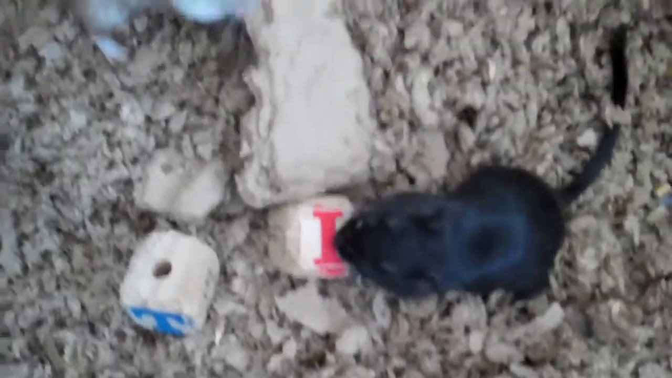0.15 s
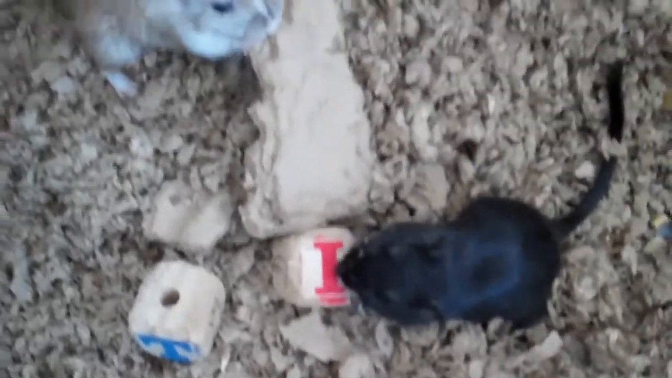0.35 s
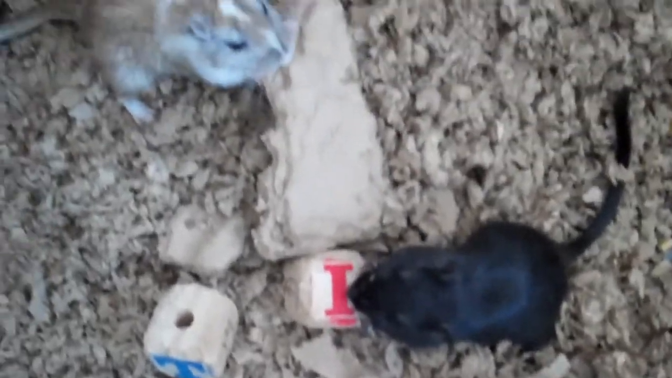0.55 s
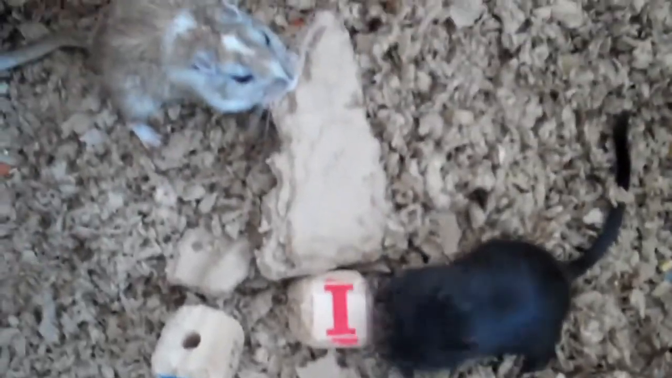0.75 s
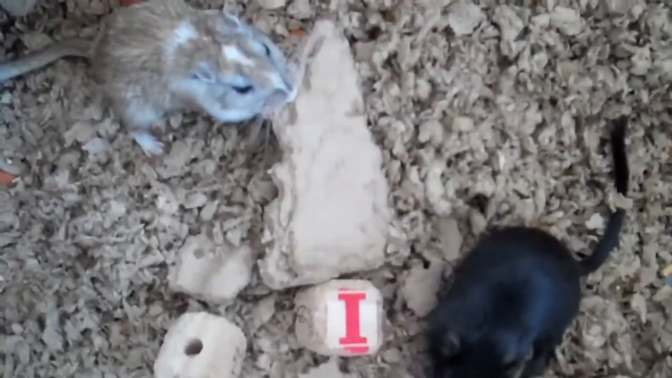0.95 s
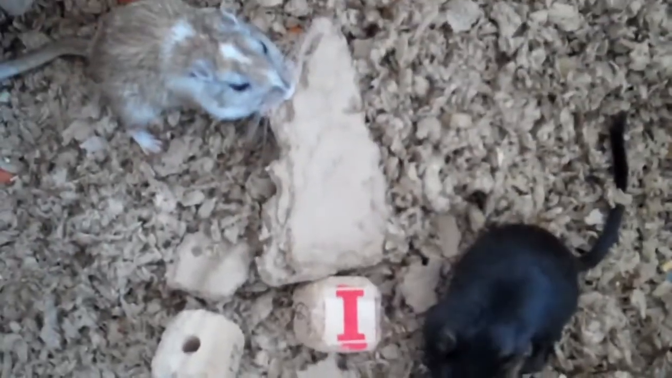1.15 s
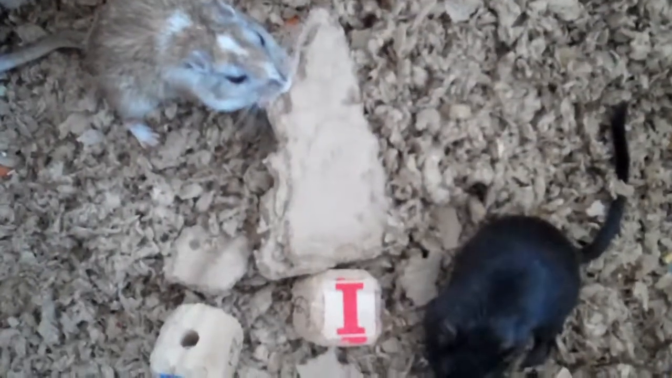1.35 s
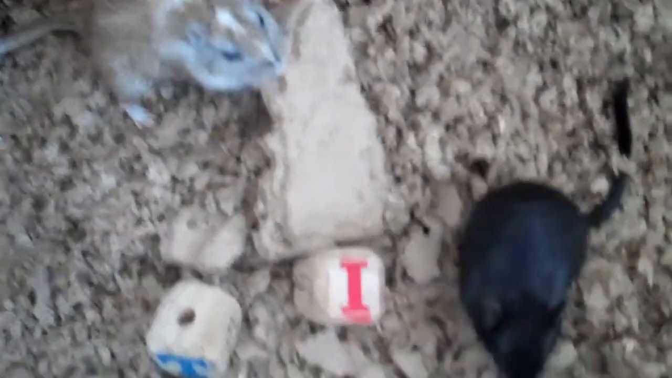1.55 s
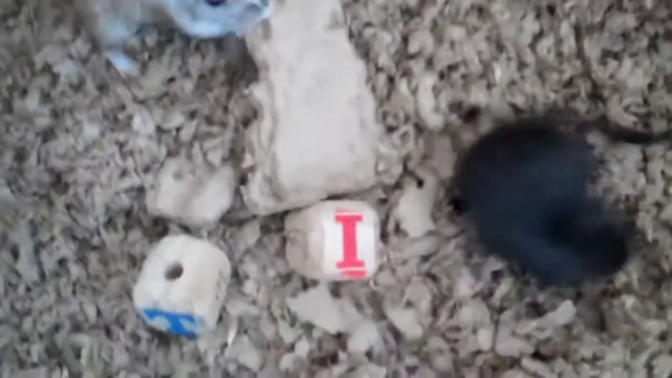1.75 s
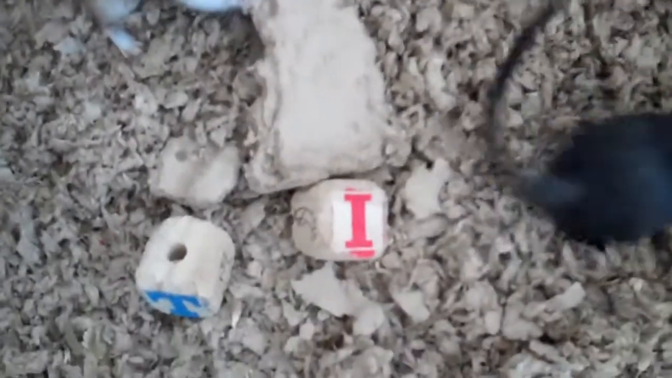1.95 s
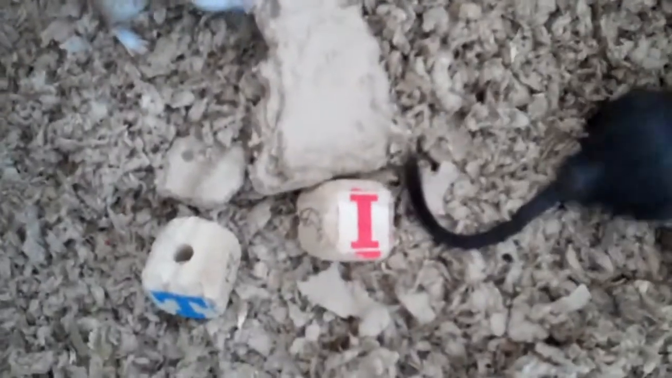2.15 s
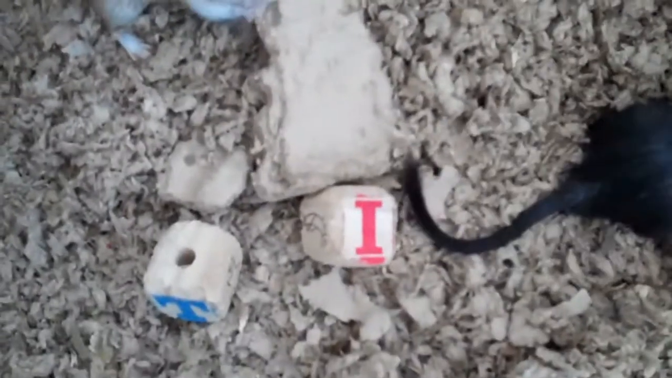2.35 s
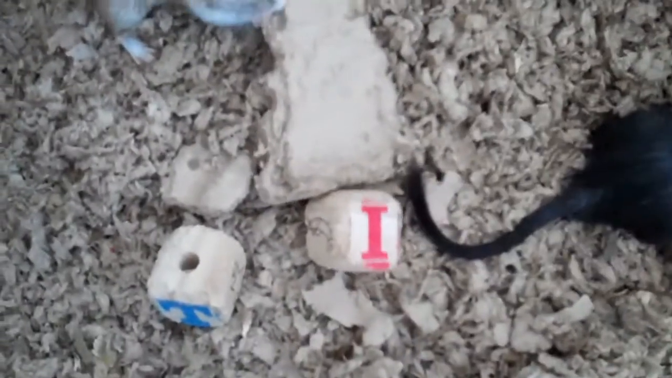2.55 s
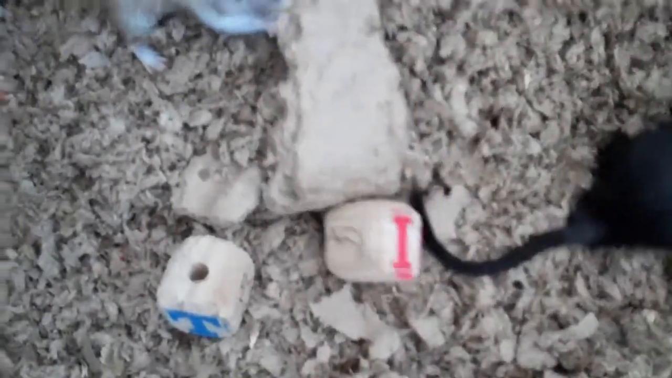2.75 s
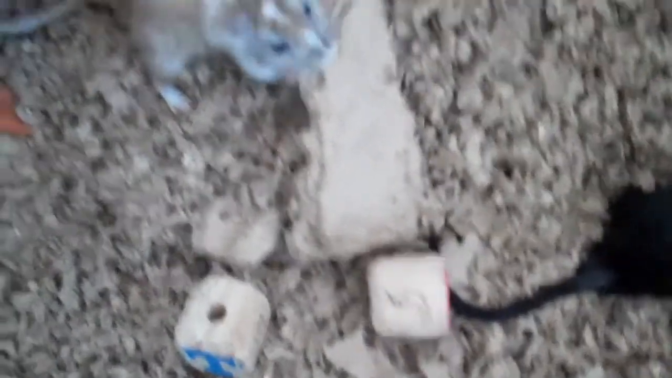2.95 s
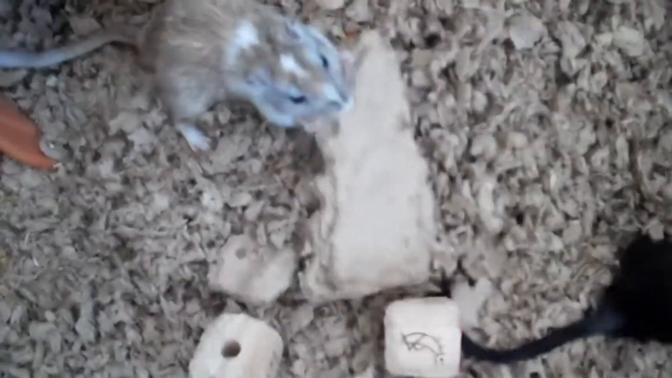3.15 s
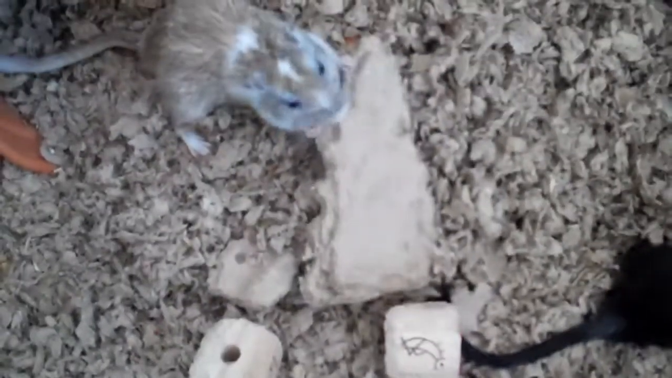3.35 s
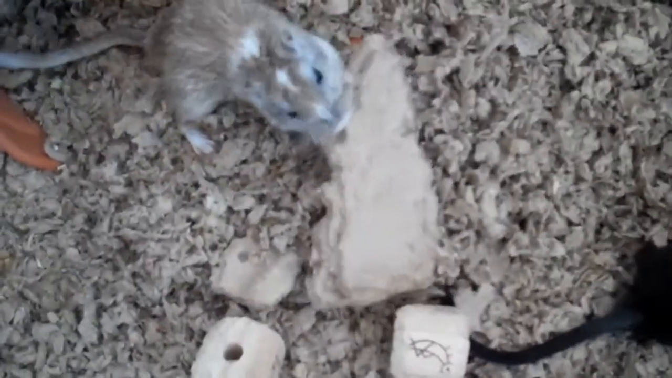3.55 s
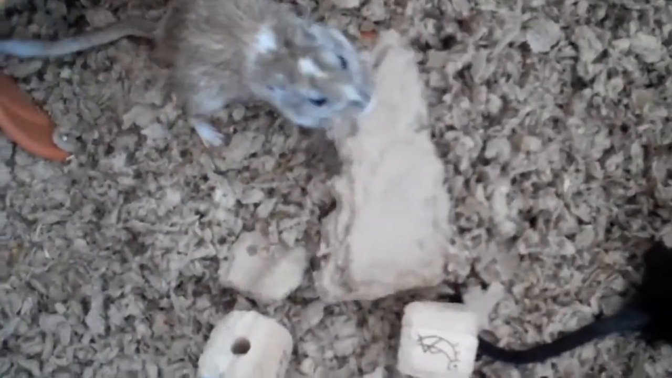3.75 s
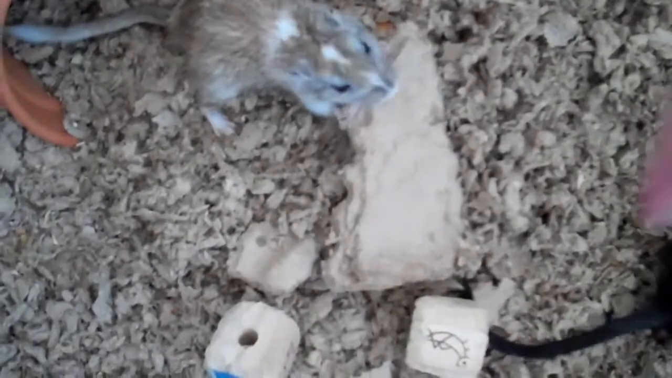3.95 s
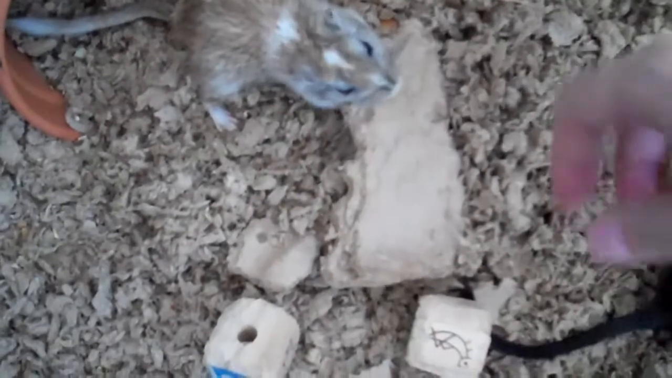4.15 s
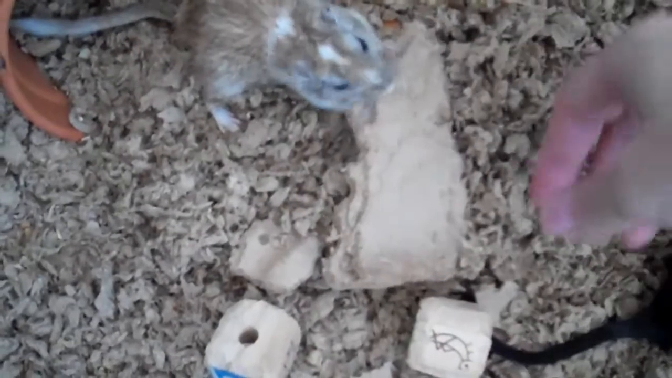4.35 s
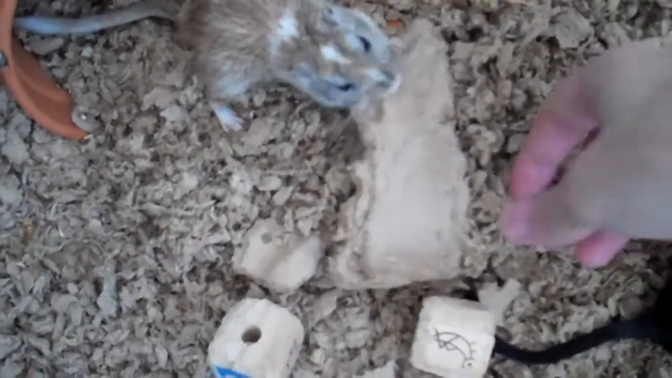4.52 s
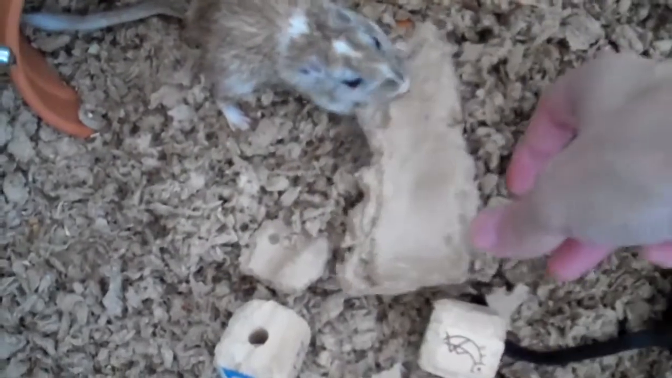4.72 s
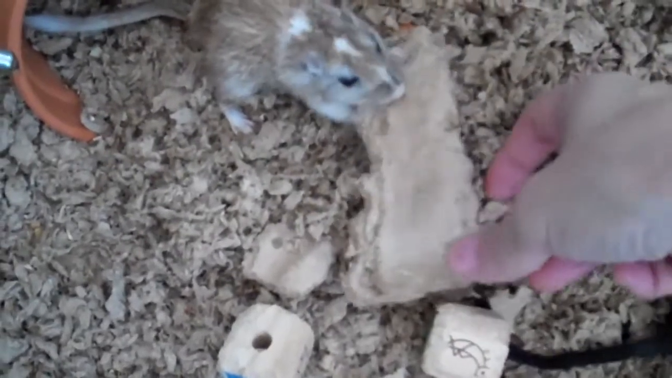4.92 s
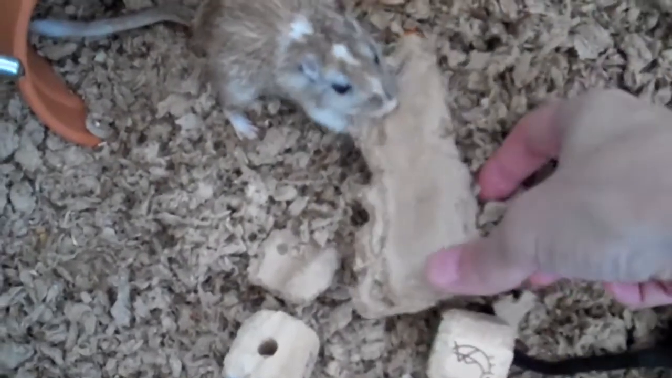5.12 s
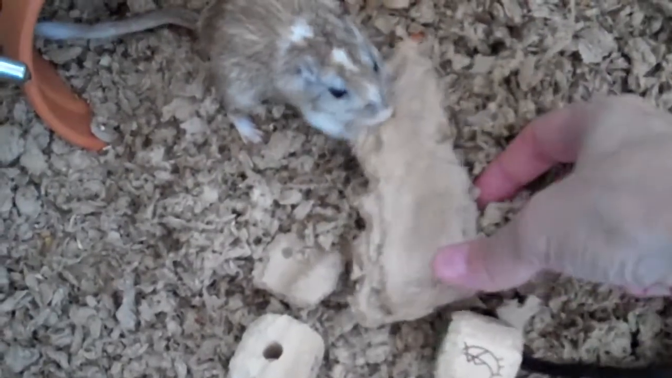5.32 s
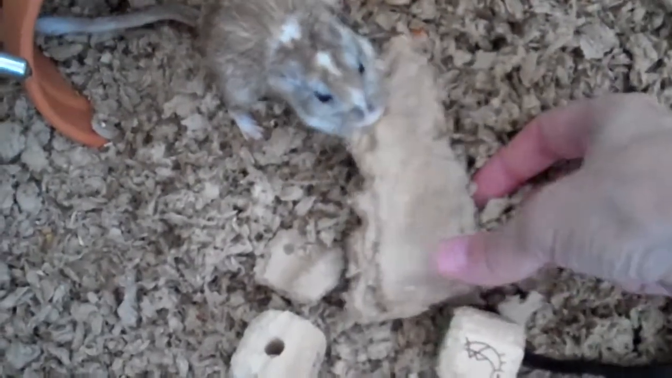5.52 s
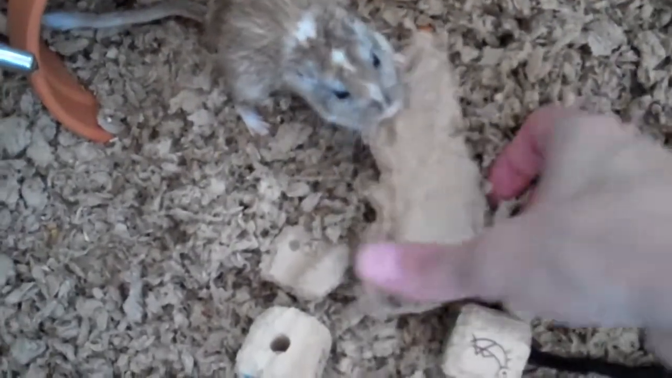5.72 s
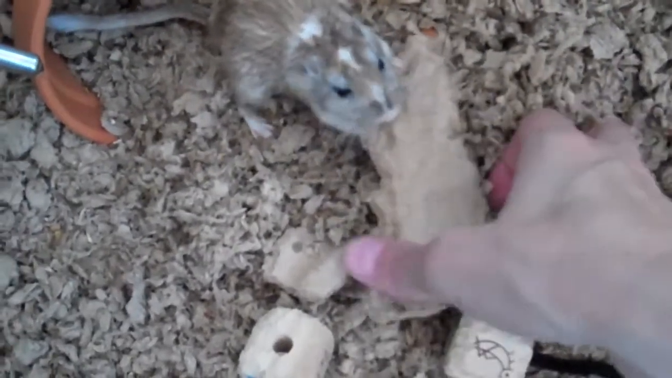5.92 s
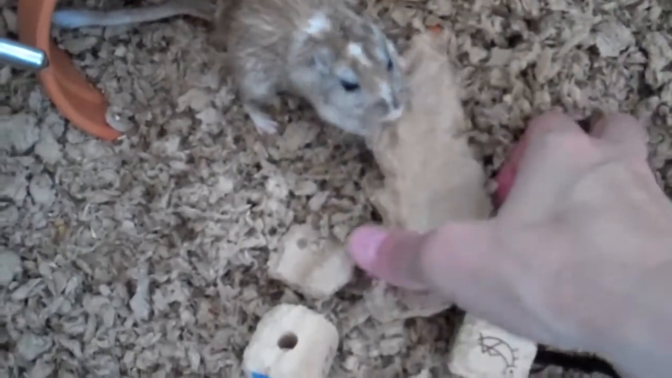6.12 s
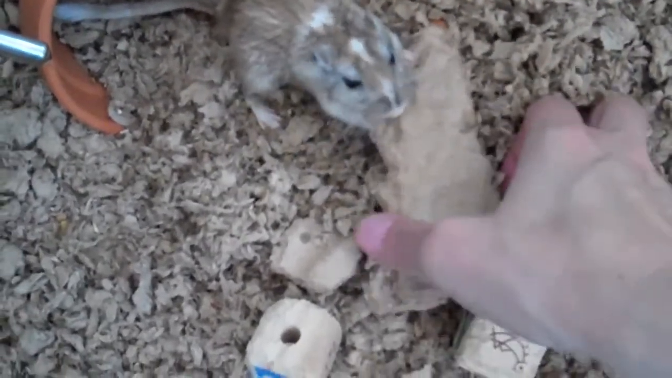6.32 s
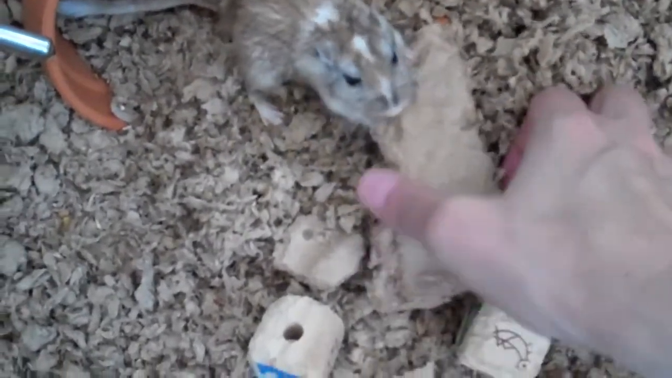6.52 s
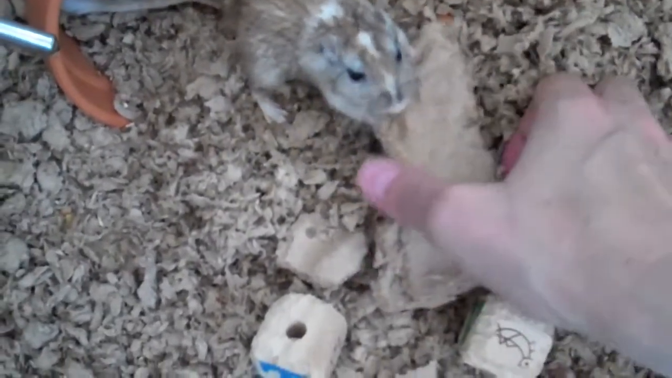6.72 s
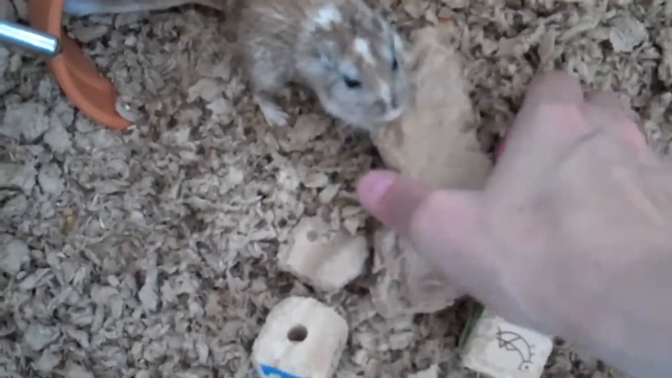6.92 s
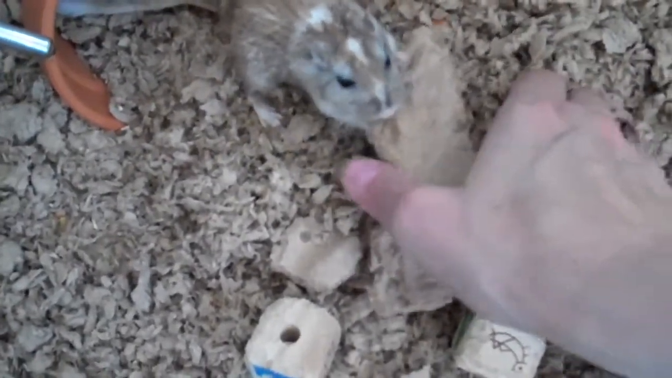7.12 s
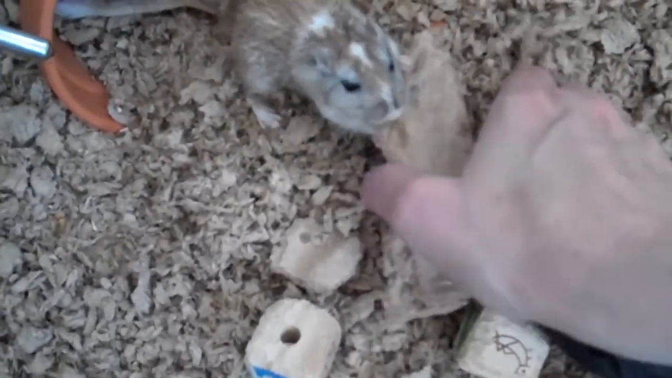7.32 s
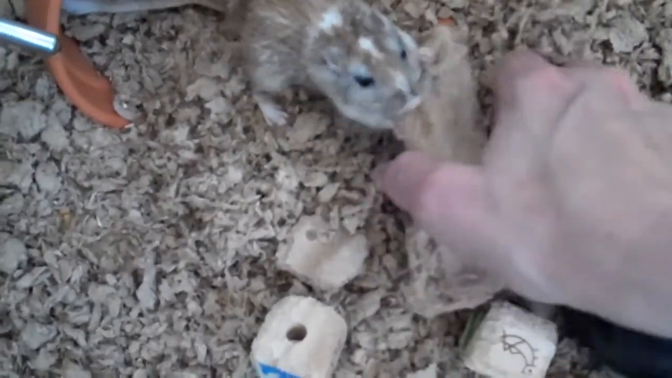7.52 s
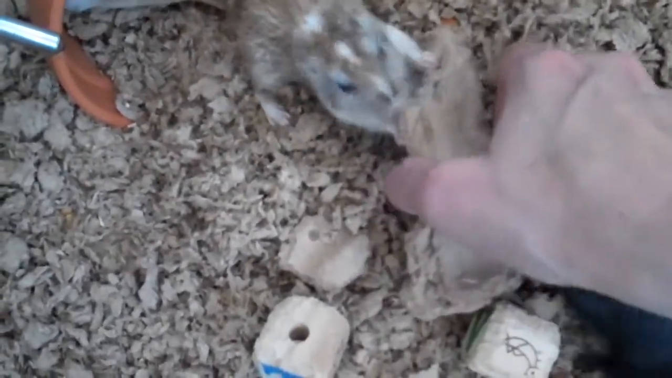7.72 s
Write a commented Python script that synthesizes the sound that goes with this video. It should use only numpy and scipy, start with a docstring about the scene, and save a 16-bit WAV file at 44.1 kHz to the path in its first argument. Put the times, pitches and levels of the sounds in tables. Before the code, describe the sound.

Close above a small rodent cage, teeth snap cardboard fibres in a few quick bites, then mostly stop. Isolated hard clicks follow amid papery scuffs as another gerbil moves off through the bedding. After a quiet gap, gnawing returns as steady bursts, about five a second, while a hand takes the strip and its tone becomes tighter. Torn edges crackle faintly over soft hiss and low rumble.

```python
"""Inside a cage, a gerbil gnaws a strip of cardboard in spells of about five bites a second.
Each bite is a run of fibre snaps; every snap travels along the strip as a bending wave, treble first.
A hand comes to hold the strip and changes its colour, and the torn edge crackles after each snap.
A second gerbil rustles through the paper bedding as crackling noise grains, the cage floor bumps softly
on a few low modes, and the room adds a faint filtered hiss and rumble."""
import sys
import numpy as np
from scipy import signal
from scipy.fft import rfft, irfft, next_fast_len
from scipy.io import wavfile
from scipy.ndimage import uniform_filter1d

SR = 44100
rng = np.random.default_rng(int(sys.argv[2]) if len(sys.argv) > 2 else 0)


def master_out(mix):
    """Clip the mix to full scale and print it as 16-bit PCM to the path in sys.argv[1]."""
    frames = np.transpose(np.atleast_2d(mix))
    ceiling = np.clip(frames, -1, 1)
    pcm = np.round(ceiling * 32767).astype(np.int16)
    wavfile.write(sys.argv[1], SR, pcm)


N = 347067
SNAP_SIZE = 4096  # samples in one snap
TOP_HZ = 15800  # upper edge of the sound


def undb(db):
    """Decibels to gain."""
    return 10 ** (np.asarray(db) / 20)


def curve(table, column=1):
    """One column of a time table, sample by sample."""
    rows = np.array(table)
    return np.interp(np.arange(N) / SR, rows[:, 0], rows[:, column])


def colour(points, hz):
    """A spectrum in dB at the given frequencies, interpolated over log frequency."""
    point_hz, db = np.transpose(points)
    return np.interp(np.log(hz + 1), np.log(point_hz), db)


def tint(x, points):
    """Filter a long sound by a spectrum and bring it to rms 1."""
    size = next_fast_len(N)
    gain = undb(colour(points, np.fft.rfftfreq(size, 1 / SR)))
    y = irfft(rfft(x, size) * gain, size)[..., :N]
    return y / y.std()


def unit(x):
    """Scale to a mean energy of 1 per channel."""
    return x / np.sqrt(np.mean(np.sum(x ** 2, axis=-1)))


def pan(left_db):
    """Channel gains for a left-minus-right level."""
    return undb(np.array([[left_db], [-left_db]]) / 2)


def walk(rate):
    """Slow random drift of spread 1, heading for a new value rate times a second."""
    y = np.interp(np.arange(N) / SR * rate, np.arange(1024), rng.standard_normal(1024))
    return y / y.std()


def swell(s, half_s):
    """A smooth rise and fall of power around time s."""
    return np.exp(-np.minimum(((np.arange(N) / SR - s) / half_s) ** 2, 40))


def treble(hz, corner_hz=5400):
    """A shelf from 0 in the body of the sound to 1 in the treble."""
    return 1 / (1 + (corner_hz / (hz + 1)) ** 6)


def add(out, s, sound):
    """Mix a sound in at time s."""
    i = max(int(s * SR), 0)
    out[:, i:i + sound.shape[-1]] += sound[..., :max(N - i, 0)]


def crackle(rate, spread_db, ring_s, shared=0.44):
    """Tiny noise grains at random times, rate a second, a few much larger than the rest."""
    sizes = undb(spread_db * np.minimum(rng.exponential(size=N), 4))
    hits = (rng.random(N) < rate / SR) * sizes
    # grains add as power, and each amplitude dies away over ring_s
    power = signal.lfilter([1], [1, -np.exp(-2 / (ring_s * SR))], hits ** 2 + 1e-12)
    noise = shared * rng.standard_normal(N) + (1 - shared) * rng.standard_normal((2, N))
    return np.sqrt(power) * noise


# Room background. Each row: time in seconds, hiss in dB, rumble in dB
ROOM_LEVELS = [(0.0, -56.5, -68), (1.6, -55, -66.5), (3.2, -58, -73), (7.87, -56.5, -71)]
# Colour of the room hiss. Each row: frequency in Hz, level in dB
HISS_COLOUR = [(90, 2.5), (170, 1.5), (260, 0.5), (500, -0.5), (1000, -1.5), (2200, -2), (4300, -2),
               (7000, -7), (10000, -13), (13000, -20.5), (15000, -37)]
# Colour of the room rumble. Each row: frequency in Hz, level in dB
RUMBLE_COLOUR = [(15, -17), (26, -8), (37, -0.5), (50, -13), (70, -4.5), (110, -11.5), (220, -33),
                 (600, -64)]


def room_tone(waver_db=0.56, waver_rate=7.9):
    """Diffuse, gently wavering hiss over a low rumble that both ears mostly share."""
    hiss = tint(rng.standard_normal((2, N)) + 0.45 * rng.standard_normal(N), HISS_COLOUR)
    rumble = tint(0.41 * rng.standard_normal((2, N)) + rng.standard_normal(N), RUMBLE_COLOUR)
    hiss = hiss * undb(curve(ROOM_LEVELS, column=1) + waver_db * walk(waver_rate))
    rumble = rumble * undb(curve(ROOM_LEVELS, column=2))
    return (hiss + rumble) * pan(1.7)


# Modes of the cage floor. Each row: frequency in Hz, level in dB, 60 dB decay time in seconds
FLOOR_RINGS = [(138, -24, 0.1), (169.7, 0.5, 0.21), (199, 2, 0.11), (261, -7, 0.11), (327, -5.5, 0.087)]
# Colour of dull rubbing. Each row: frequency in Hz, level in dB
RUBBING_COLOUR = [(60, -25), (125, -16), (230, -19), (350, 7), (600, -19), (1500, -30)]
# Paws and hand pressing on the bedding. Each row: middle in seconds, half length in seconds, level in dB
BEDDING_PRESSES = [(2.05, 0.13, -66), (3.067, 0.022, -63.5), (5.2, 0.31, -67), (5.883, 0.053, -56.5),
                   (6.256, 0.044, -57), (6.47, 0.11, -65)]
# Soft bumps on the floor. Each row: time in seconds, peak in dB before the common trim
FLOOR_BUMPS = [(2.012, -45), (2.089, -47), (6.218, -49), (6.399, -46.5), (6.57, -52)]


def cage_floor(push_s=0.024, bump_trim_db=-1.5, resting_db=-74, rub_db=-8):
    """Soft pushes ring the floor modes: bumps and slow presses over constant small movement."""
    t = np.arange(SR // 3) / SR
    ring = np.zeros(len(t))
    for hz, db, t60 in FLOOR_RINGS:
        ring += undb(db) * np.sin(2 * np.pi * hz * t) * np.exp(-np.log(1000) * t / t60)
    drone = signal.fftconvolve(rng.standard_normal(N), ring)[:N]
    rubbing = undb(rub_db) * tint(rng.standard_normal((2, N)), RUBBING_COLOUR)
    power = np.full(N, undb(resting_db) ** 2)
    for s, half_s, db in BEDDING_PRESSES:
        power += undb(db) ** 2 * swell(s, half_s)
    out = (drone / drone.std() + rubbing) * np.sqrt(power)
    for s, db in FLOOR_BUMPS:
        # the noisy push swells for half of push_s, then dies away
        push = rng.standard_normal(len(t)) * t * np.exp(-2 * t / push_s)
        bump = signal.fftconvolve(push, ring)
        add(out, s - .005, bump / np.abs(bump).max() * undb(db + bump_trim_db))
    return out


# Loud or lone fibre snaps. Each row: time in seconds, level in dB, brightness in dB,
# resonance that the place of biting favours in Hz
LOUD_SNAPS = [(0.0678, -40.5, 5, 2400), (0.1088, -46, -11, 1600), (0.1388, -24, 8, 3130),
              (0.1711, -26, 3, 2300), (0.1803, -24, -3, 2430), (0.271, -28, -2, 3120),
              (0.3103, -34.5, 1, 3200), (1.6047, -21, -10, 2700), (1.607, -19.5, 2, 1790),
              (1.7385, -28.5, -11, 2690), (2.5061, -25.5, 0, 3100), (2.555, -18.5, 8, 4000),
              (2.7505, -33, 4, 4500), (4.6346, -30.5, -9, 2500), (4.7605, -27, -4, 6000),
              (4.7636, -23.5, -1, 3360), (4.9067, -22, -2.5, 7600), (4.9396, -20.5, -8, 1650),
              (4.9424, -18, -7, 3740), (5.075, -32.5, -5, 1700), (5.0933, -23, -3, 4000),
              (5.1033, -20.5, -0.5, 7500), (5.1088, -26, -5, 3300), (5.249, -40.5, -2, 5600),
              (5.3057, -25.5, 0.5, 5400), (5.466, -29, -12, 2700), (5.4751, -22, -2.5, 5600),
              (5.4775, -22, 3, 2520), (5.6783, -39, -3, 3970), (5.7516, -41.5, 12, 6200),
              (5.835, -24.5, 8.5, 9000), (5.8517, -28, 3, 6800), (5.8679, -25.5, 0, 3600),
              (5.9274, -36, 10, 7400), (6.059, -18.5, 6, 5800), (6.0655, -25.5, 8, 3800),
              (6.088, -36.5, -3, 3800), (6.2576, -27, -3, 2700), (6.297, -31.5, -15, 2000),
              (6.354, -47, -4, 1400), (6.4877, -43.5, -6, 1710), (6.8314, -27.5, 1.5, 6700),
              (7.0506, -23, 6.5, 1700), (7.0603, -25.5, -1, 1610), (7.0698, -23.5, -1, 1800),
              (7.2434, -34, 0, 1600), (7.4584, -28.5, 2, 7900), (7.7124, -34, 0, 1960)]
# Bites of lesser snaps. Each row: start in seconds, length in seconds, level of a snap in dB and
# brightness in dB, both before scatter
BITE_RUNS = [(0.159, 0.0062, -35.5, 0), (0.277, .008, -44.5, 1), (0.313, 0.0074, -49, -2),
             (0.414, 0.0089, -45.5, 4), (1.572, 0.012, -43, 4), (1.722, 0.021, -35.5, 3),
             (2.5625, .021, -37, 4), (2.764, 0.0085, -43.5, 7), (4.622, 0.0084, -38.5, -11),
             (4.766, 0.013, -31.5, -5.5), (4.911, 0.038, -36, -15), (5.11, 0.012, -34, -4),
             (5.3115, 0.0041, -33, -11), (5.456, .025, -31.5, -4), (5.8446, .034, -35, -7),
             (6.037, .009, -37, 2), (6.266, .015, -29.5, -1), (6.646, 0.0062, -39.5, 3),
             (6.85, .014, -33, -3.5), (7.052, .024, -33.5, -8), (7.257, .035, -38, -6),
             (7.4532, .011, -34, -2), (7.66, 0.02, -48.5, -5)]


def fibre_snaps(count=4, jitter=.15, scatter_db=3.0, bright_scatter_db=3, favour_range_hz=(1700, 7100),
                release_s=.028, release_db=-17, release_bright_db=7):
    """List loud snaps, an uneven run through each bite, and a faint bright tick as the teeth let go."""
    snaps = list(LOUD_SNAPS)
    for start_s, length_s, db, bright_db in BITE_RUNS:
        for k, (late, louder, brighter, place) in enumerate(rng.uniform(-0.92, 1, (count, 4))):
            s = start_s + length_s * (k + jitter * late) / (count - 1)
            favour_hz = np.exp(np.interp(place, [-1, 1], np.log(favour_range_hz)))
            snaps.append((s, db + scatter_db * louder, bright_db + bright_scatter_db * brighter, favour_hz))
        release_at = start_s + length_s + release_s
        snaps.append((release_at, db + release_db, bright_db + release_bright_db, favour_hz))
    return snaps


# Resonances of the strip. Each row: frequency in Hz, width in Hz,
# lift in dB before the random share and the levelling of their broad average
STRIP_RESONANCES = [(547, 110, 1.5), (756, 57, 4), (1233, 35, 7), (1840, 500, 7), (2073, 88, 6),
                    (2566, 290, 13), (3122, 330, 7.5), (3817, 400, 6), (4254, 780, 6), (5060, 180, -1),
                    (5480, 480, 6), (6020, 320, 8), (6960, 280, 5), (7640, 120, 4)]


def strip_response(grip, bright_db, favour_hz, hz, travel_s, slowest_hz=900, favour_db=5, favour_width=0.21):
    """Causal response of the strip; bending waves slow down as 1 / sqrt(f), taking travel_s at 1 kHz."""
    # each place of biting favours other modes
    shares = rng.uniform(.65, 1.35, len(STRIP_RESONANCES))
    lift = np.zeros(len(hz))
    for share, (mode_hz, width_hz, db) in zip(shares, STRIP_RESONANCES):
        lift += share * db / (1 + (2 * (hz - mode_hz) / width_hz) ** 2)
    lift -= uniform_filter1d(lift, size=130)
    # the favoured resonance has a width that is a share of its frequency
    lift += favour_db / (1 + (2 * (hz / favour_hz - 1) / favour_width) ** 2)
    # folding the cepstrum gives minimum phase, so nothing sounds before the snap
    cepstrum = irfft(np.log(undb(colour(grip, hz) + lift + bright_db * treble(hz))))
    cepstrum[1:SNAP_SIZE // 2] *= 2
    cepstrum[SNAP_SIZE // 2 + 1:] = 0
    # delay behind the first treble to arrive, summed over frequency into phase
    delay = travel_s * np.sqrt(1000) * (1 / np.sqrt(np.maximum(hz, slowest_hz)) - 1 / np.sqrt(TOP_HZ))
    phase = 2 * np.pi * np.cumsum(np.maximum(delay, 0)) * hz[1]
    return np.exp(rfft(cepstrum) - 1j * phase)


# Colour of the strip bitten at its tip. Each row: frequency in Hz, level in dB
TIP_COLOUR = [(150, -24), (400, -15), (700, -5.5), (1100, -9), (1700, -1), (2800, 2), (3700, -0.5),
              (4700, 0.5), (5600, -8), (7300, -11), (10000, -14.5), (15000, -30.5)]
# Colour of the strip lying free. Each row: frequency in Hz, level in dB
FREE_COLOUR = [(150, -29), (450, -15), (1000, -15), (1750, -2), (2600, -0.5), (4000, 1), (4800, -5.5),
               (5500, -23), (7200, -14.5), (9600, -10.5), (12000, -20), (15000, -44)]
# Colour of the strip pressed by a thumb. Each row: frequency in Hz, level in dB
PRESSED_COLOUR = [(150, -38.5), (400, -13), (1100, -19), (1450, -13), (1850, -3.5), (2700, -9.5),
                  (3900, -2.5), (4700, -8), (7500, -7), (9000, -13.5), (11500, -20.5), (15000, -38)]
# Colour of the strip held in the hand. Each row: frequency in Hz, level in dB
HELD_COLOUR = [(150, -49), (450, -6.5), (1250, -15), (1850, 3.5), (2400, -2), (3200, -1), (4300, 3.5),
               (5900, -11), (7100, -2), (9500, -12.5), (11500, -19.5), (15000, -31)]
# Moments when the strip goes from tip to free, to pressed, to held. Each entry: time in seconds
GRIP_TIMES = [1, 4.5, 5.62]


def gnawing(snaps, travel_s=0.002297, tear_s=0.00061, tear_db=-8,
            near_s=.0008, near_db=-6, near_treble_db=8, echo_s=0.001414, echo_db=-9,
            cage_s=0.016, cage_treble_db=-9, cage_body_db=7, room_s=0.036, room_db=-23, left_db=3.0):
    """Each snap is a sharp break with a brief tear, rung through the strip and scattered by the cage."""
    t, hz = np.arange(SNAP_SIZE) / SR, np.fft.rfftfreq(SNAP_SIZE, 1 / SR)
    out, high = np.zeros((2, N)), treble(hz, corner_hz=4270)
    for s, db, bright_db, favour_hz in snaps:
        noise = rng.standard_normal((7, SNAP_SIZE))
        crack = 1 + undb(tear_db) * rfft(unit(noise[0] * np.exp(-t / tear_s)))
        # a nearby wall returns the crack, a little sooner or later as the head moves
        echo_delay = echo_s * rng.uniform(.3, 1.7)
        crack = crack * (1 + undb(echo_db) * np.exp(-2j * np.pi * hz * echo_delay))
        # close reflections differ between the ears, most of all in the treble
        near = rfft(unit(noise[1:3] * t * np.exp(-2 * t / near_s)))
        near = near * undb(near_db + near_treble_db * high)
        # the bedding soaks up the treble, so the cage returns more of the low body
        cage = rfft(unit(noise[3:5] * np.exp(-t / cage_s)))
        cage = cage * undb(cage_treble_db + cage_body_db * (1 - treble(hz, corner_hz=1260)))
        room = undb(room_db) * rfft(unit(noise[5:7] * np.exp(-t / room_s)))
        grip = (TIP_COLOUR, FREE_COLOUR, PRESSED_COLOUR, HELD_COLOUR)[np.searchsorted(GRIP_TIMES, s)]
        strip = strip_response(grip, bright_db, favour_hz, hz, travel_s)
        # only the body leans left; the treble stays central
        spectrum = (crack + near + cage + room) * strip * pan(left_db) ** (1 - high)
        snap = irfft(spectrum) * (1 - (t / t[-1]) ** 4)
        # the level is that of the snap's energy spread over 2 ms
        add(out, s, unit(snap) * np.sqrt(.002 * SR) * undb(db))
    return out


def fraying(snaps, relax_s=0.0053, follow=0.45, rate=1200, spread_db=3, gain_db=-30):
    """After each snap the torn edge relaxes and finer fibres give way as a fading crackle."""
    jolts = np.zeros(N)
    for s, db, *_ in snaps:
        jolts[int(s * SR)] += undb(db) ** 2
    strain = signal.lfilter([1], [1, -np.exp(-2 / (relax_s * SR))], jolts + 1e-18)
    fibres = tint(crackle(rate, spread_db, ring_s=0.0029), PRESSED_COLOUR)
    # the crackle moves by follow dB for each dB of strain
    return fibres * strain ** (follow / 2) * undb(gain_db) * pan(2.6)


# Spells of stirring. Each row: start in seconds, end in seconds, level in dB before the fidgeting
STIRRING_SPELLS = [(0.23, 0.49, -60), (0.72, 1.05, -63.5), (1.66, 2.034, -57), (2.277, 2.642, -58),
                   (2.987, 3.14, -60), (3.533, 3.906, -58), (4.045, 4.334, -60.5), (4.56, 5.586, -58.5),
                   (5.693, 6.66, -60.5), (6.69, 7.87, -61.5)]
# The stronger scuffs. Each row: middle in seconds, half length in seconds, level of the swell in dB
BEDDING_SCUFFS = [(1.883, 0.013, -46.5), (1.925, 0.011, -51.5), (1.966, 0.0093, -42), (2.4, 0.011, -43),
                  (2.587, 0.0078, -40.5), (2.763, 0.018, -45.5), (3.067, .008, -56), (3.11, 0.018, -51.5),
                  (3.677, 0.0087, -47.5), (3.769, 0.0034, -51), (3.808, 0.014, -56.5), (4.123, .009, -51),
                  (4.155, 0.0028, -51), (7.836, 0.022, -46.5)]
# Colour of the paper bedding. Each row: frequency in Hz, level in dB
BEDDING_COLOUR = [(300, -10), (1000, -19.5), (2000, 0.5), (4000, 0.5), (5500, -3.5), (8000, -0.5),
                  (10500, -5), (13500, -16.5), (15500, -48)]


def bedding(rate=700, spread_db=3, flake_s=.0016, tick_s=.0008, fade_s=0.065, fidget_rate=35, fidget_db=3.0):
    """Paws and fingers shift flakes of paper: spells of fidgety stirring with short scuffs."""
    t, power = np.arange(N) / SR, np.zeros(N)
    for start_s, end_s, db in STIRRING_SPELLS:
        spell = np.clip(np.minimum(t - start_s, end_s - t) / fade_s + .5, 0, 1)
        power += undb(db) ** 2 * spell
    power *= undb(fidget_db * walk(fidget_rate)) ** 2
    for s, half_s, db in BEDDING_SCUFFS:
        # a flake flicks free at the height of the scuff; the shorter the scuff, the more it is one tick
        tick = .03 / half_s * (t >= s) * np.exp(-np.clip((t - s) / tick_s, 0, 40))
        power += undb(db) ** 2 * (swell(s, half_s) + tick)
    flakes = tint(crackle(rate, spread_db, ring_s=flake_s), BEDDING_COLOUR)
    return flakes * np.sqrt(power) * pan(1.1)


def scene():
    """Everything heard from just above the cage."""
    snaps = fibre_snaps()
    return room_tone() + cage_floor() + gnawing(snaps) + fraying(snaps) + bedding()


def record(dry):
    """The recorder cuts the top with a steep low-pass."""
    return signal.sosfilt(signal.ellip(8, .2, 70, TOP_HZ, fs=SR, output="sos"), dry)


dry = scene()
out = record(dry)
master_out(out)
```